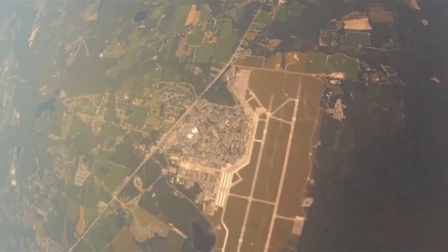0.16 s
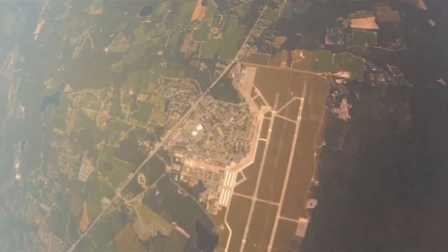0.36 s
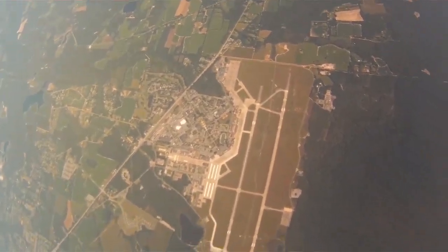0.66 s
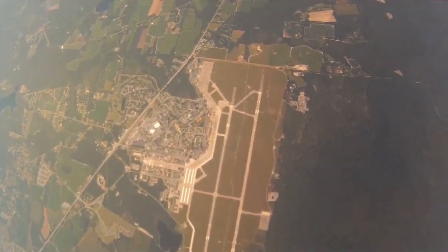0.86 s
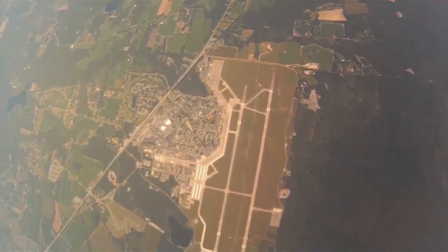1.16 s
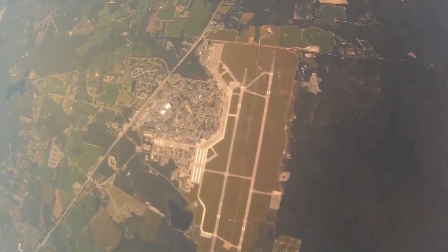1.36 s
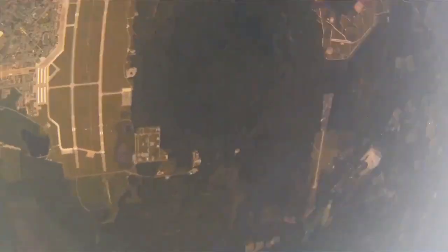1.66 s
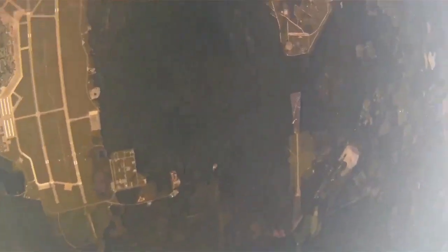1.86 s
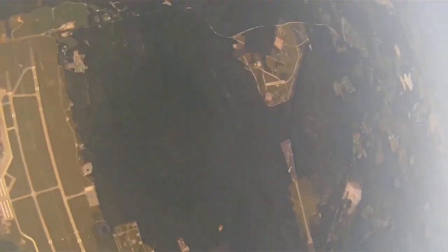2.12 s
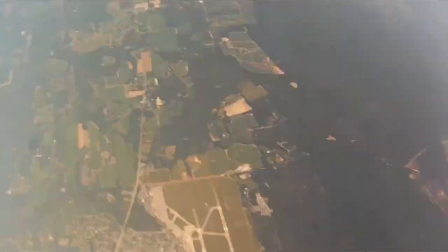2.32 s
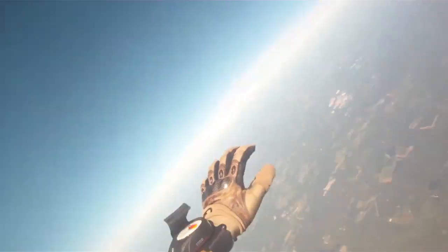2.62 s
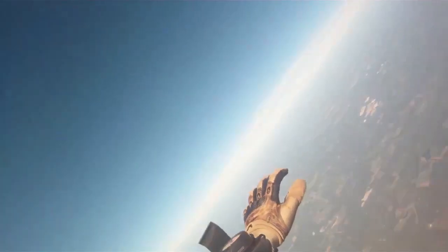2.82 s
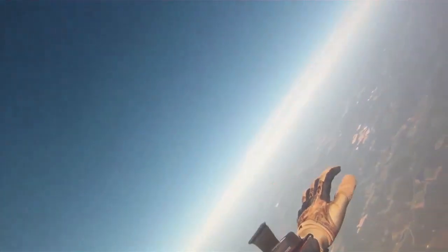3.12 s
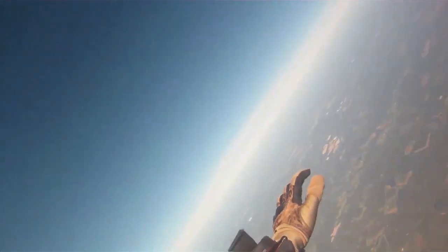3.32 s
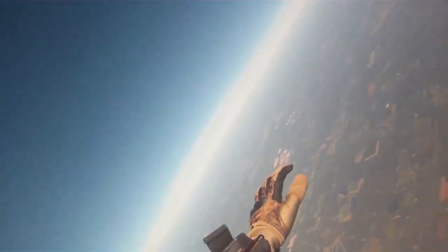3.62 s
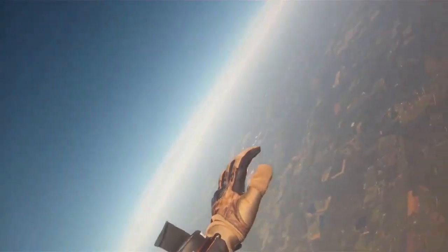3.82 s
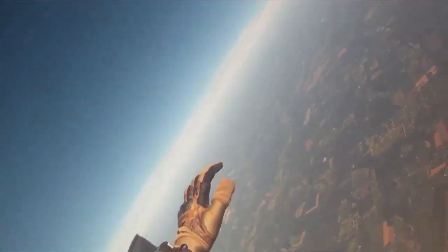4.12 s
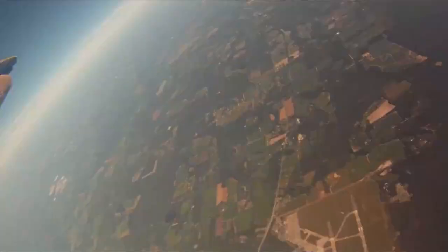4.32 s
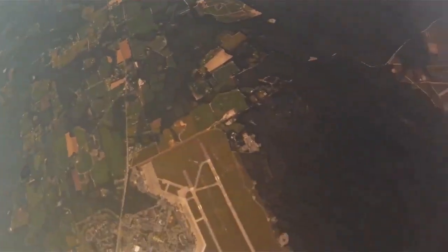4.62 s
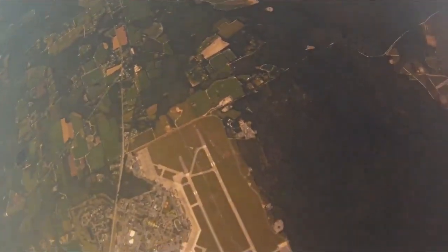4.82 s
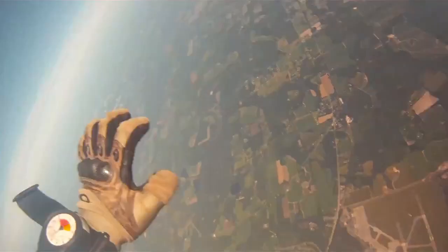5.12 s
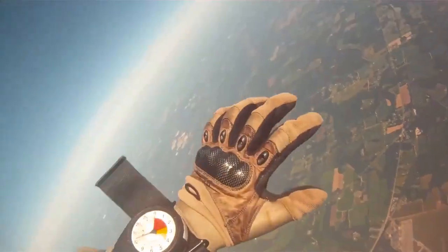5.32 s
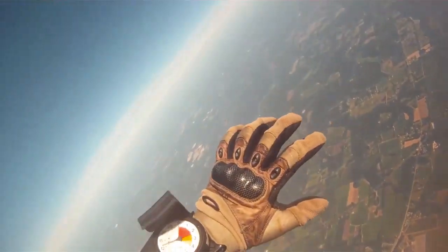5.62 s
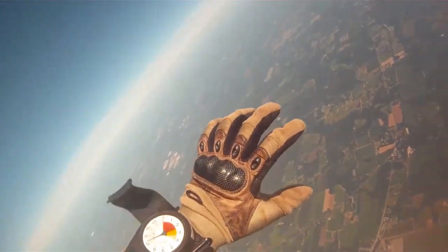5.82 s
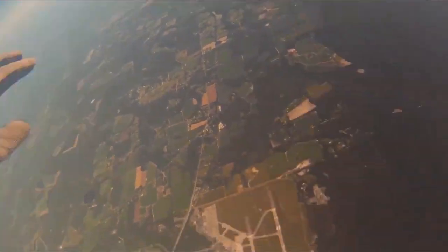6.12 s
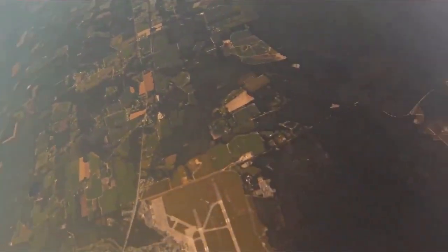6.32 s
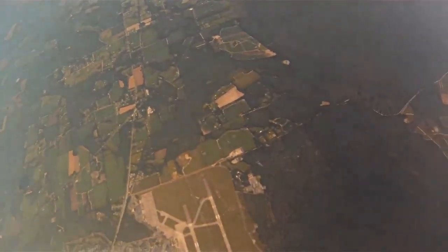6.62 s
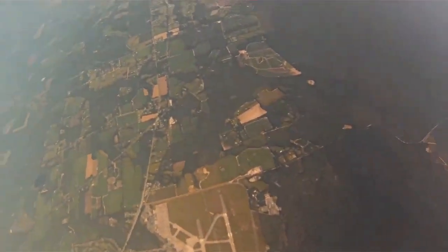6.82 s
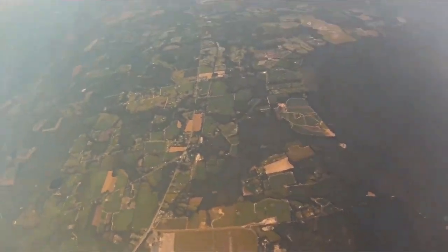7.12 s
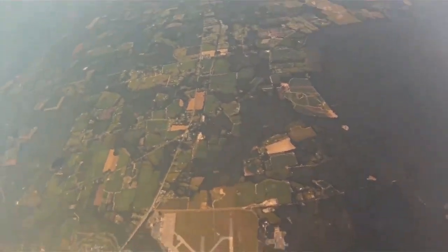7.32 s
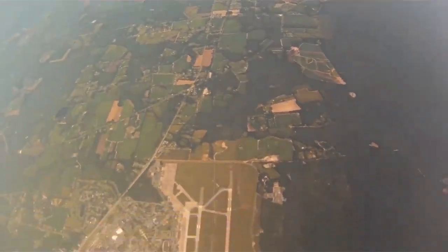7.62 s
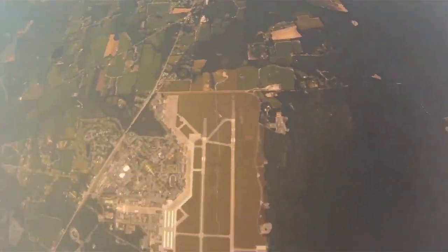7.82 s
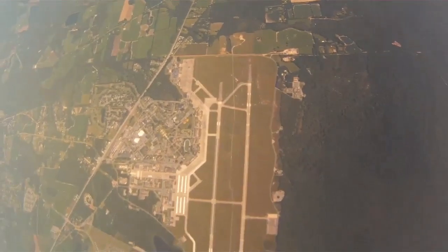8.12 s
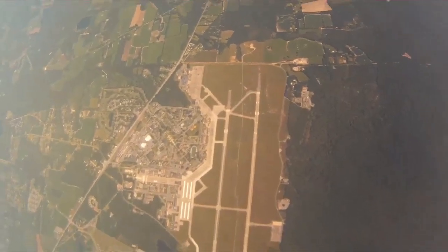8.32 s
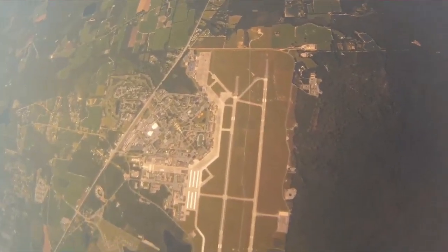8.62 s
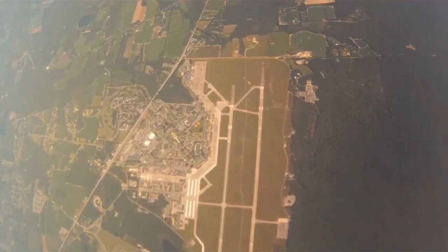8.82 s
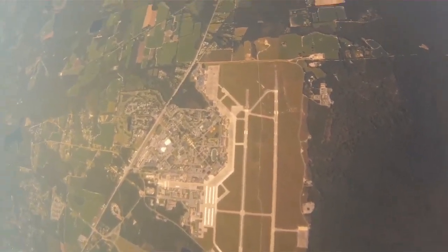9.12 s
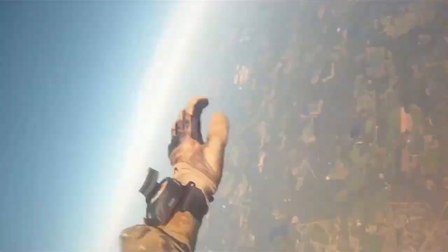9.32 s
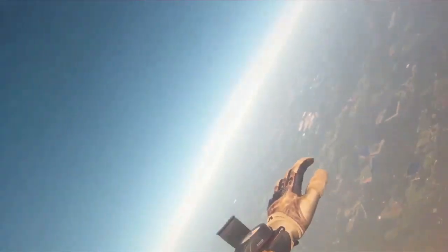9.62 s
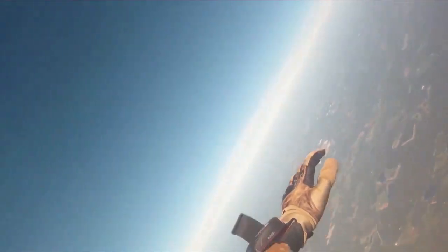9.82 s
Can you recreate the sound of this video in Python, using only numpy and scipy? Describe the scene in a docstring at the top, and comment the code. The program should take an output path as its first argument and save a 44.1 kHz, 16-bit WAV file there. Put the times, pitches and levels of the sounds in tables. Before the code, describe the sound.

Unbroken freefall wind hits a small camera microphone sealed in a housing on a skydiver's helmet. It starts as a bright, hissy rush with a faint low hum, jumps to a hollow midrange roar with buffeting, briefly brightens, roars again with a duller, fluttering colour, brightens once more and ends in the roar. Small slaps tick against the housing. Open sky, no echo, very close microphone.

```python
"""Freefall: turbulent flow past a small camera in a closed housing on a skydiver's helmet.
At first the port lies in the lee: shaped noise gives a bright rush, gliding tones a low vortex hum.
From about 2.4 s the raised head meets the stream: the housing roars, eddies buffet it, the hum drops.
The lee returns near 4.4 s, the stream near 5.2 s with the arm's wake, the lee at 7.9 s, the stream
at 9.3 s. Short noise bursts slap the housing throughout; low-rate sampling adds a mirrored fizz."""
import sys
import numpy as np
from scipy import signal
from scipy.fft import rfft, irfft
from scipy.io import wavfile
from scipy.ndimage import uniform_filter1d

SR = 44100
rng = np.random.default_rng(int(sys.argv[2]) if len(sys.argv) > 2 else 0)


def inscribe(sig):
    """Save sig as 16-bit PCM at rate SR to the path in sys.argv[1].

    A 1-D sig is mono; a 2-D sig holds one channel per row.
    Samples are clipped to [-1, 1] before scaling.
    """
    pcm = np.round(np.clip(np.atleast_2d(sig).T, -1, 1) * 32767)
    wavfile.write(sys.argv[1], SR, pcm.astype(np.int16))


N = 439236

# Turbulence spectra through the housing wall, of which only the shape within each band counts:
# (frequency [Hz], spectral level [dB per Hz])
LEE_SPECTRUM = [(25, -126), (60, -100), (130, -74), (260, -77), (385, -81), (620, -71.5), (850, -64),
                (1250, -63.5), (1850, -59.5), (2400, -52.5), (3400, -60.5), (4400, -74), (5400, -80),
                (6000, -100)]
FACING_SPECTRUM = [(25, -106), (80, -83), (140, -71.5), (230, -66), (380, -69), (620, -60), (850, -51),
                   (1250, -58.5), (1880, -60.5), (2400, -55.5), (3300, -65), (4400, -79.5), (5400, -88.5),
                   (6000, -105)]
# Resonances and dips of the housing: (frequency [Hz], width [Hz], lift in the lee [dB],
# lift facing the stream [dB], further lift in the arm's wake [dB])
HOUSING_MODES = [(523, 50, 1.5, 2, 4.5), (620, 83, 1.5, 0.5, -6), (723.5, 29, 5, 9.5, 4.5),
                 (786, 100, 3, 2, -4), (948, 91, 2.5, 8, -2), (1011.4, 92, 10, 2.5, -0.5),
                 (1168, 124, 1.5, 4, 1.5), (1660, 72, 2, 2, 0.5), (2140, 200, 5, 4.5, 0.5),
                 (2460, 180, 0, 2, -1.5), (2840, 100, 4.5, -5.5, 6), (3540, 230, -0.5, 4, 2.5),
                 (3855, 200, -6, 2, 1.5), (4076, 330, 4.5, 4.5, 1), (4940, 250, 1, 4, 0)]
# What the recorder's interpolation leaves of the mirrored sound: (frequency [Hz], gain [dB])
MIRROR_RESPONSE = [(6000, 0.5), (7000, -9), (8000, -17.5), (9000, -27), (9800, -31.5), (11000, -44),
                   (12000, -57), (13000, -50), (14200, -44), (15200, -45)]
# Single eddies that slap the housing:
# (time [s], level [dB], pitch [Hz], bandwidth [Hz], length [s])
SLAP_EVENTS = [(1.768, -20, 2250, 1600, .005), (2.27, -24, 2250, 400, 0.036),
               (2.92, -32.5, 233, 79.6, 0.092), (3.13, -38, 150, 110, 0.058), (4.03, -34, 180, 130.6, .014),
               (4.08, -33, 201, 130, .016), (5.246, -21, 2240, 350, 0.02), (5.295, -37, 184, 120, 0.03),
               (5.435, -19.5, 2230, 350, 0.016), (6.02, -33.5, 173, 120, 0.036),
               (7.111, -23, 2200, 300, .05), (7.135, -42, 169.6, 120, 0.026), (7.62, -46, 150, 110, 0.047),
               (7.82, -43, 140, 110, 0.053), (9.881, -16, 2460, 500, 0.004),
               (9.911, -19, 1700, 1896, 0.0038)]
# Poses of head and arm, each held until the next: (middle of the move [s], duration of the move [s],
# exposure of the port [0 lee - 1 facing the stream], share of the arm's wake [0-1],
# howl round the housing's edge [dB], pitch of the buffeting eddies [Hz])
BODY_POSES = [(0, .1, 0.024, 0, 0.5, 290), (.72, 0.12, .1, 0.07, 7.5, 270), (1.64, 0.17, 0.3, 0, 5.5, 272),
              (2.3, .1, .48, 0.4, 0.5, 240), (2.45, 0.21, .93, 0.1, 2.5, 240), (2.7, .15, 1, 0, 3.5, 208),
              (3.45, .25, 0.91, 0.03, 1, 302), (4.35, 0.23, 0.25, 0.03, 4.5, 220),
              (5.15, 0.1, 0.89, 0.57, 0.5, 215), (6.14, .1, .66, .85, -0.5, 205),
              (6.66, .12, .56, 0.54, 1, 230), (6.99, 0.23, 1, 0.62, 1.5, 216),
              (7.64, 0.16, .8, 0.5, 1, 190), (7.869, .16, 0.091, 0, 4.5, 270),
              (9.28, 0.15, 0.97, 0.4, 1.5, 280)]
# Gusts, each strongest round one pitch: (time [s], length [s], lift [dB], pitch [Hz])
GUST_EVENTS = [(0.107, 0.039, 2.5, 2000), (1.437, 0.11, 12, 100), (1.867, 0.14, 14, 109.5),
               (1.868, 0.34, 11, 550), (2.08, 0.51, 3.5, 5500), (2.148, 0.081, 3, 895),
               (2.92, .55, 8.5, 125.8), (3.61, .12, 2.5, 4000), (3.773, .04, 3, 2000), (4.12, .2, 0.5, 850),
               (4.277, 0.16, 2, 1500), (4.46, 0.071, 8, 100), (4.62, 0.33, 2.5, 3980),
               (5.75, 0.36, 1, 1600), (6.021, .25, 9.5, 140), (6.11, 0.064, 3.5, 850),
               (6.137, 0.12, 3, 4000), (6.35, .5, 3.5, 88), (6.8, 0.84, 1.5, 4000),
               (7.026, 0.046, 5.5, 900), (7.04, 0.085, 4, 3520), (7.445, 0.43, 2.5, 4000),
               (7.377, 0.044, 11, 550), (7.53, 0.07, 2.5, 1000), (7.72, 0.24, 3.5, 250),
               (7.85, .14, 3.5, 2710), (8.17, 0.066, 4.5, 2500), (9.277, .07, 3.5, 850),
               (9.474, .2, 1.5, 700), (9.78, .16, 7, 452)]
# Lulls, where the whole flow lets go of the housing: (time [s], length [s], drop [dB])
LULL_EVENTS = [(0.576, 0.055, 1.5), (1.65, 0.064, 2), (2.36, 0.17, 2.5), (3.12, .2, 0.5), (3.717, .05, 1),
               (3.842, .12, 1.5), (4.363, 0.031, 2), (5.135, 0.072, 2), (7.174, 0.12, 2),
               (9.186, 0.086, 1.5), (9.326, .1, 1.5)]
# Ranges of eddy size, from large to small: (low edge [Hz], high edge [Hz], level in the lee [dB],
# level facing the stream [dB], change in the arm's wake [dB], rms flutter [dB])
BUFFET_BAND = (32, 547, -48.5, -36.5, -4, 1.2)
ROAR_BAND = (553, 1231, -31.5, -22.5, -5.5, 0.84)
RUSH_BAND = (1253, 2594, -22.5, -23, 0.8, 0.57)
HISS_BAND = (2603, 7230, -24.6, -29, -0.2, 0.82)
# Vortex hum, then its octave: (level in the lee [dB], level facing the stream [dB])
HUM_LEVELS = [(-51, -56), (-67.5, -59)]

HOWL_HZ, HOWL_WIDTH_HZ = 1435, 310
GUST_OCTAVES = 1.12  # spread of a gust round its pitch
# vortices shed by the helmet slow down as the head comes up
SHED_LEE_HZ, SHED_FACING_HZ = 133, 63
# an air cavity, excited by the arm's wake, swells the hum near this pitch
CAVITY_HZ, CAVITY_WIDTH_HZ, CAVITY_DB = 173, 27, 24
RECORDER_HZ = 12000  # sampling rate of the recorder
BAND_LIMIT_HZ = 15300
FRAME_SIZE, HOP = 2048, 512  # samples
TIME = np.arange(N) / SR
FRAME_TIME = np.arange(N // HOP + 3) * HOP / SR
BIN_HZ = np.fft.rfftfreq(FRAME_SIZE, 1 / SR)


def gain_of(db):
    """Level law: amplitude is ten to the power of decibels over twenty."""
    return 10 ** (np.asarray(db) / 20)


def evened(x):
    """Normalisation of mean power: scales to rms 1."""
    return x / np.sqrt(np.mean(x ** 2) + 1e-20)


def read_spectrum(points, hz):
    """Interpolation of a spectrum by straight lines on a log-frequency axis."""
    point_hz, db = np.transpose(points)
    return np.interp(np.log(hz + 1), np.log(point_hz), db)


def hump(offset, width):
    """Gaussian law: height 1 at the centre, one half at half the width from it."""
    return 0.5 ** ((2 * offset / width) ** 2)


def resonance(hz, width_hz):
    """Selectivity of one resonance over the bins, 1 at its centre."""
    return hump(BIN_HZ - hz, width_hz)


def per_sample(by_frame):
    """Linear interpolation of frame values to the sample rate."""
    return np.interp(TIME, FRAME_TIME, by_frame)


def wander(slow_hz, fast_hz):
    """Band-limited random fluctuation: noise of rms 1 between two rates."""
    hz = np.fft.rfftfreq(N, 1 / SR)
    shape = hz / np.hypot(hz, slow_hz) / (1 + (hz / fast_hz) ** 2)
    return evened(irfft(rfft(rng.standard_normal(N)) * shape, N))


def patches(frames, bins):
    """Local correlation: a random field of rms 1, averaged over frames and bins."""
    field = rng.standard_normal((len(FRAME_TIME), len(BIN_HZ)))
    field = uniform_filter1d(field, frames, axis=0)
    return evened(uniform_filter1d(field, bins, axis=1))


def pose(t):
    """Smooth kinematics: exposure, wake, howl and eddy pitch ease from each pose to the next."""
    rows = np.array(BODY_POSES)
    state = rows[0, 2:, None] + np.zeros(len(t))
    for before, after in zip(rows, rows[1:]):
        progress = np.clip((t - after[0]) / after[1], -0.5, 0.5)
        eased = 0.5 + 0.5 * np.sin(np.pi * progress)
        state = state + np.outer(after[2:] - before[2:], eased)
    return np.clip(state[0], 0, 1), *state[1:]


def surge_db(hz):
    """Unsteady flow: by frame, gusts lift the sound round their own pitch, lulls drop all of it."""
    gusts = sum(db * hump(FRAME_TIME - s, length) * hump(np.log2(hz / gust_hz), GUST_OCTAVES)
                for s, length, db, gust_hz in GUST_EVENTS)
    lulls = sum(db * hump(FRAME_TIME - s, length) for s, length, db in LULL_EVENTS)
    return gusts - lulls


def vortex_hum(jitter=0.045, throb_db=2.0, fuzz=0.55):
    """Vortex shedding: uneven peeling gives a fuzzy hum and its octave, lower as the head comes up."""
    exposure, wake, _, _ = pose(FRAME_TIME)
    shed_hz = SHED_LEE_HZ + exposure * (SHED_FACING_HZ - SHED_LEE_HZ)
    unsteady_hz = per_sample(shed_hz) * (1 + jitter * wander(slow_hz=3.5, fast_hz=30))
    phase = 2 * np.pi * np.cumsum(unsteady_hz) / SR
    out = np.zeros(N)
    for multiple, (lee_db, facing_db) in enumerate(HUM_LEVELS, 1):
        level_db = lee_db + exposure * (facing_db - lee_db) + surge_db(multiple * shed_hz)
        level_db += wake * CAVITY_DB * hump(multiple * shed_hz - CAVITY_HZ, CAVITY_WIDTH_HZ)
        # a complex envelope makes both strength and phase uneven
        uneven = 1 + fuzz * (wander(slow_hz=4, fast_hz=12) + 1j * wander(slow_hz=4, fast_hz=11))
        tone = evened((uneven * np.exp(1j * multiple * phase)).real)
        out += tone * gain_of(per_sample(level_db) + throb_db * wander(slow_hz=4, fast_hz=15))
    return out


def slaps():
    """Transient excitation: each eddy is a brief swell of narrow-band noise round its own pitch."""
    out = np.zeros(N)
    for s, db, hz, width_hz, length in SLAP_EVENTS:
        near = abs(TIME - s) < 2 * length
        swell = hump(TIME[near] - s, length)
        bandpass = np.fft.fftshift(irfft(resonance(hz, width_hz)))
        noise = signal.fftconvolve(rng.standard_normal(SR), bandpass, "valid")
        burst = swell * noise[:len(swell)]
        # give the burst the energy of its swell
        burst *= np.linalg.norm(swell) / np.linalg.norm(burst)
        out[near] += gain_of(db) * burst
    return out


def housing_colour(eddy_db=4.5, eddy_width_hz=90, patchy_db=1.0):
    """Forced resonance: the stream's angle sets the slope and which modes it drives, by frame and bin."""
    exposure, wake, howl_db, eddy_hz = (column[:, None] for column in pose(FRAME_TIME))
    lee_db, facing_db, wake_db = sum(np.outer(lifts, resonance(hz, width_hz))
                                     for hz, width_hz, *lifts in HOUSING_MODES)
    db = (1 - exposure) * (read_spectrum(LEE_SPECTRUM, BIN_HZ) + lee_db)
    db += exposure * (read_spectrum(FACING_SPECTRUM, BIN_HZ) + facing_db)
    db += wake * wake_db
    db += howl_db * resonance(HOWL_HZ, HOWL_WIDTH_HZ)
    db += eddy_db * resonance(eddy_hz, eddy_width_hz)
    # passing eddies favour now one pitch, now another
    return gain_of(db + patchy_db * patches(frames=9, bins=6))


def eddies(colour, low_hz, high_hz):
    """Turbulent pressure: noise of rms 1 from one range of eddy sizes, coloured by the housing."""
    low_edge = 1 + (low_hz / (BIN_HZ + 1)) ** 20
    high_edge = 1 + (BIN_HZ / high_hz) ** 20
    shape = colour / np.sqrt(low_edge * high_edge)
    # equal power in every frame, so that the level is set apart from the colour
    shape /= np.linalg.norm(shape, axis=1, keepdims=True)
    spectra = shape * (rng.standard_normal(shape.shape) + 1j * rng.standard_normal(shape.shape))
    noise = signal.istft(spectra.T, nperseg=FRAME_SIZE, noverlap=FRAME_SIZE - HOP)[1]
    return evened(noise[:N])


def airstream():
    """Scale of turbulence: large eddies thump, middling roar, small rush and hiss, by pose and gust."""
    colour = housing_colour()
    exposure, wake, _, _ = pose(FRAME_TIME)
    flutter = wander(slow_hz=1.3, fast_hz=49)
    lumps = wander(slow_hz=5, fast_hz=25)
    out = np.zeros(N)
    for band, unrest in [(BUFFET_BAND, lumps), (ROAR_BAND, flutter),
                         (RUSH_BAND, flutter), (HISS_BAND, flutter)]:
        low_hz, high_hz, lee_db, facing_db, wake_db, flutter_db = band
        level_db = lee_db + exposure * (facing_db - lee_db) + wake * wake_db
        level_db += surge_db((low_hz + high_hz) / 2)
        gain = gain_of(per_sample(level_db) + flutter_db * unrest)
        out += eddies(colour, low_hz, high_hz) * gain
    return out


def scene():
    """Superposition: hum, slaps and airstream add at the one microphone."""
    return (vortex_hum() + slaps() + airstream())[None]


def record(dry):
    """Spectral imaging: low-rate sampling mirrors the wind as a thin fizz; a band limit follows."""
    hz = np.fft.rfftfreq(N, 1 / SR)
    sampled = irfft(rfft(dry) * (hz < RECORDER_HZ / 2), N)
    mirrored = 2 * sampled * np.cos(2 * np.pi * RECORDER_HZ * TIME)
    fizz = irfft(rfft(mirrored) * gain_of(read_spectrum(MIRROR_RESPONSE, hz)), N)
    lowpass = signal.firwin(511, BAND_LIMIT_HZ, window=("kaiser", 9), fs=SR)
    return signal.oaconvolve(sampled + fizz, lowpass[None], "same")


dry = scene()
out = record(dry)
inscribe(out)
```